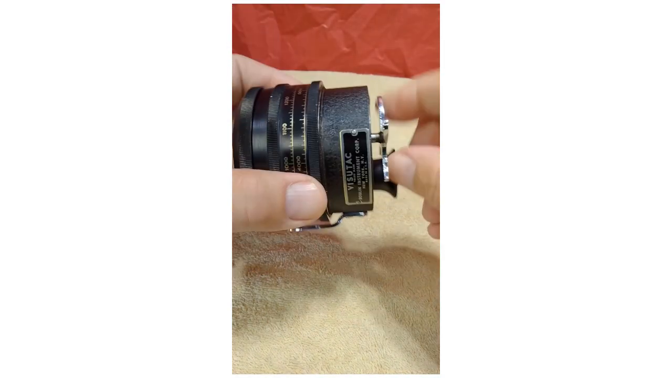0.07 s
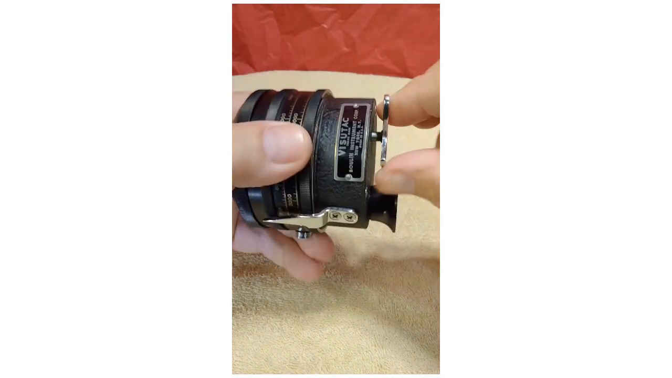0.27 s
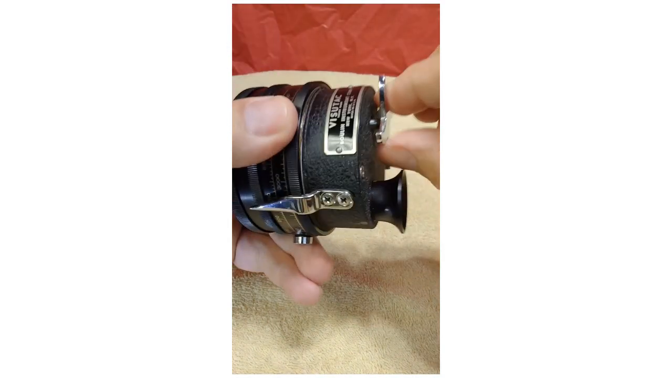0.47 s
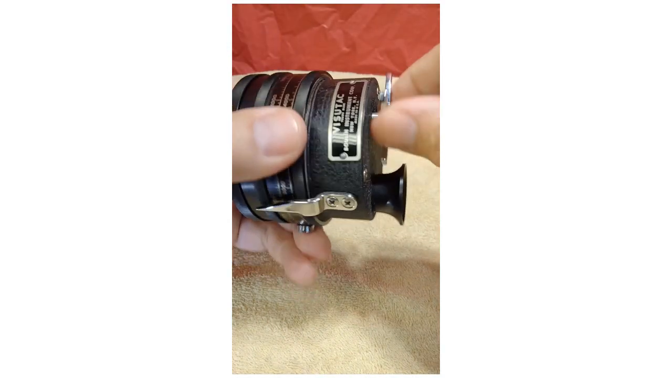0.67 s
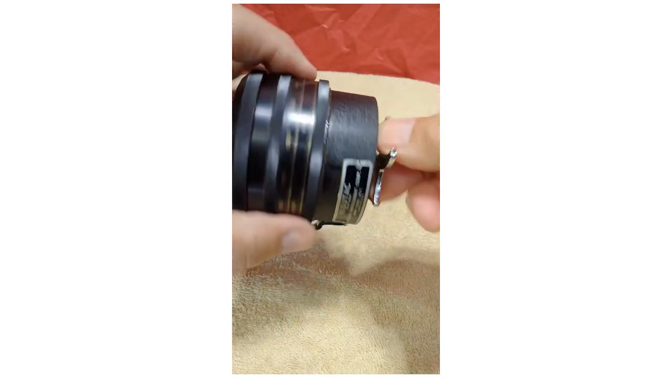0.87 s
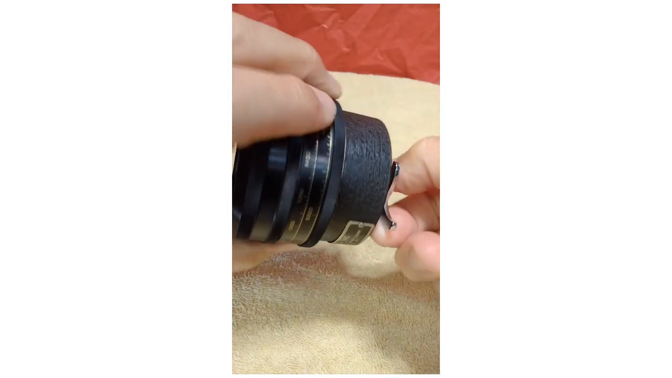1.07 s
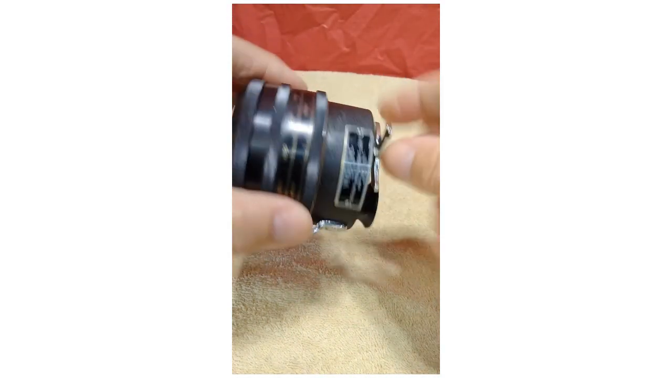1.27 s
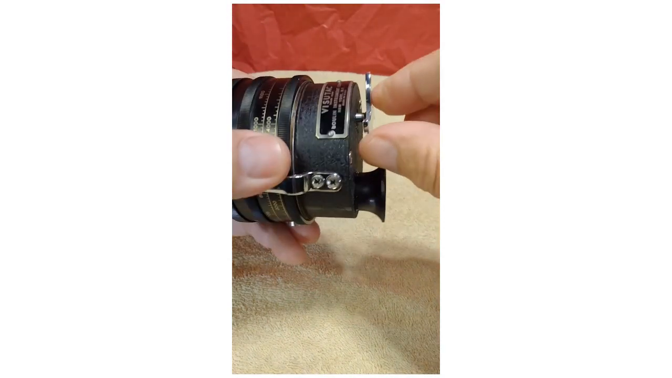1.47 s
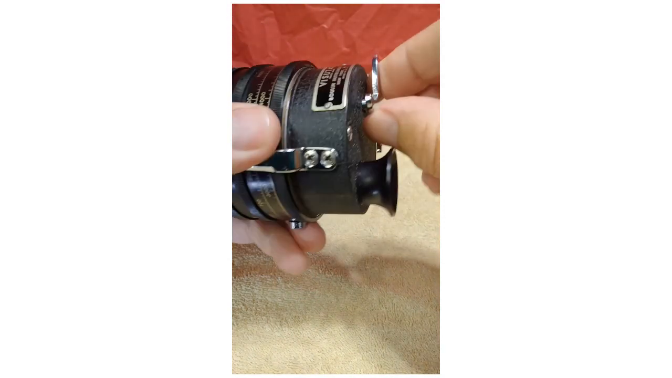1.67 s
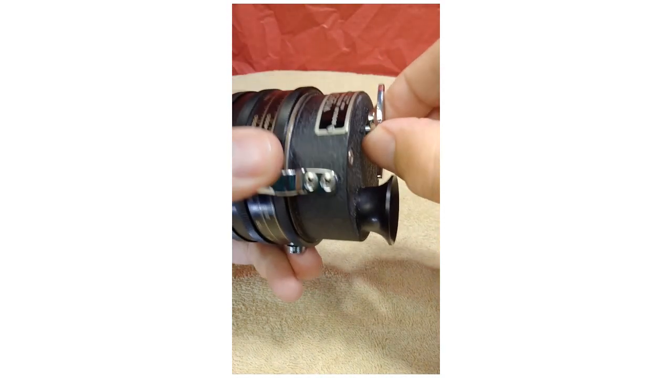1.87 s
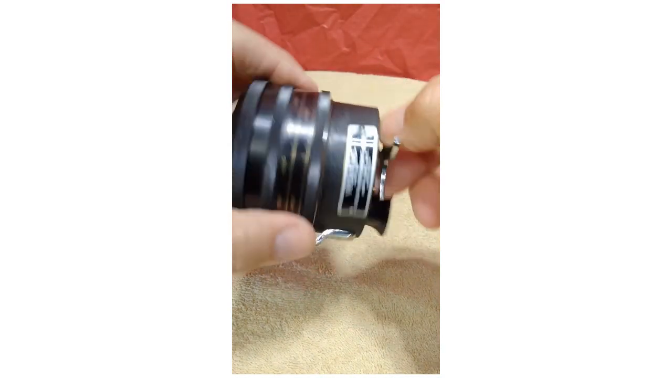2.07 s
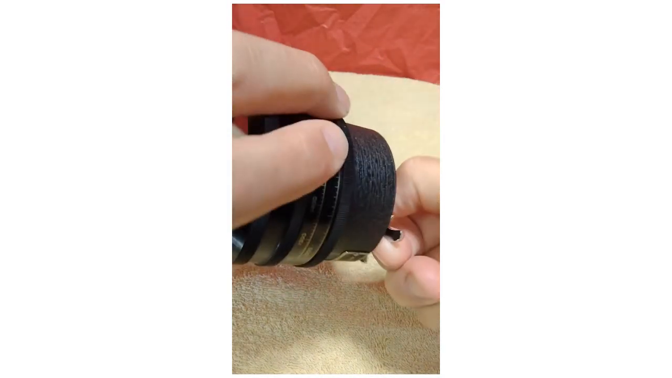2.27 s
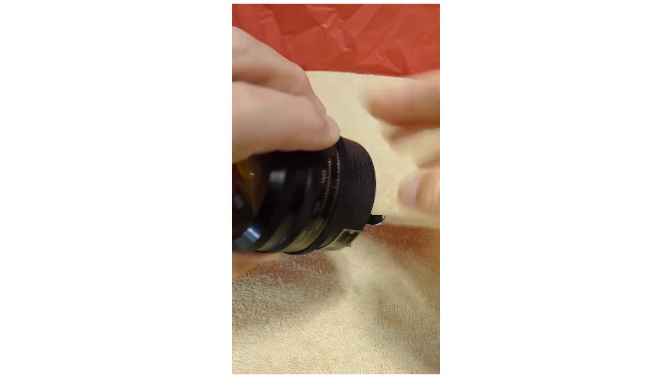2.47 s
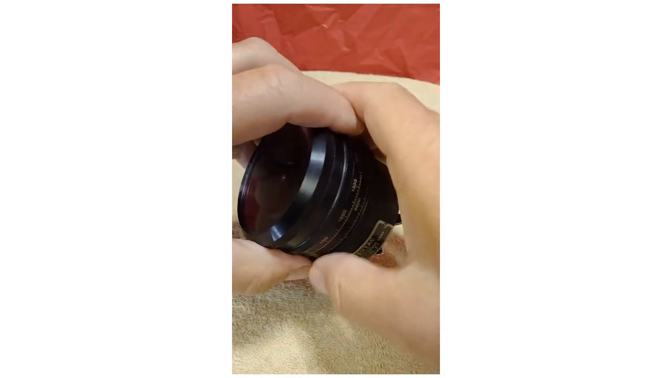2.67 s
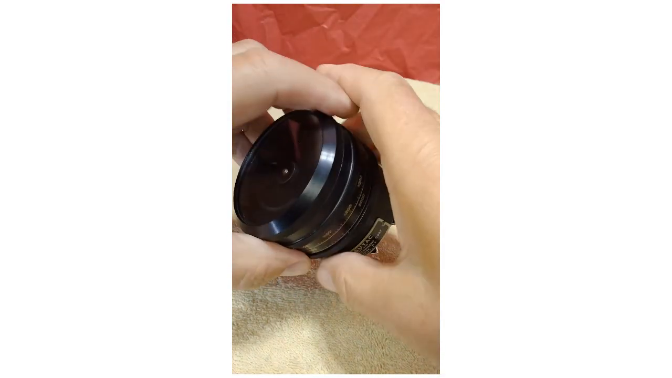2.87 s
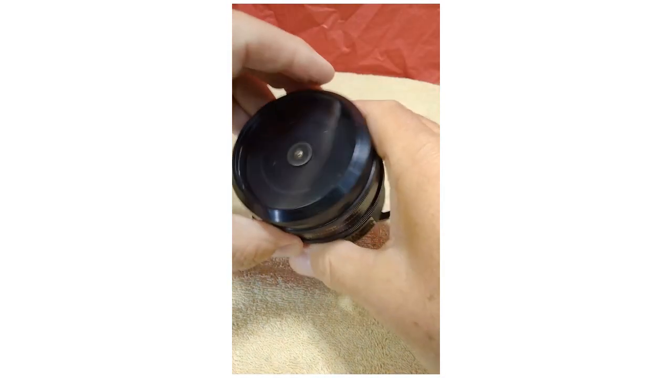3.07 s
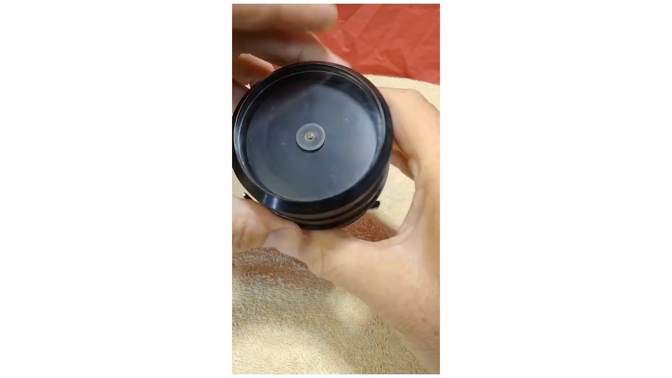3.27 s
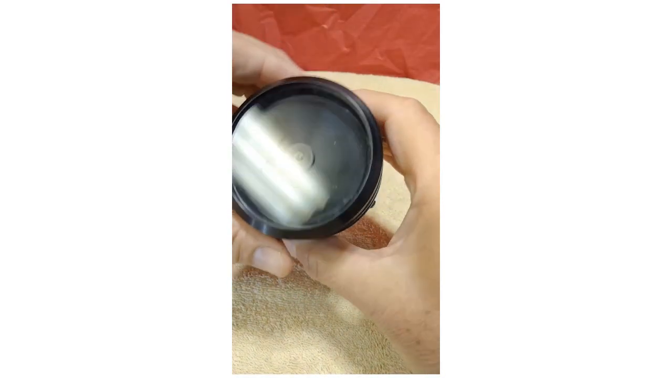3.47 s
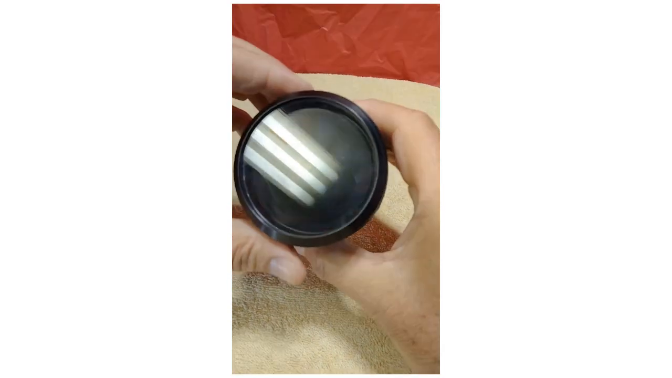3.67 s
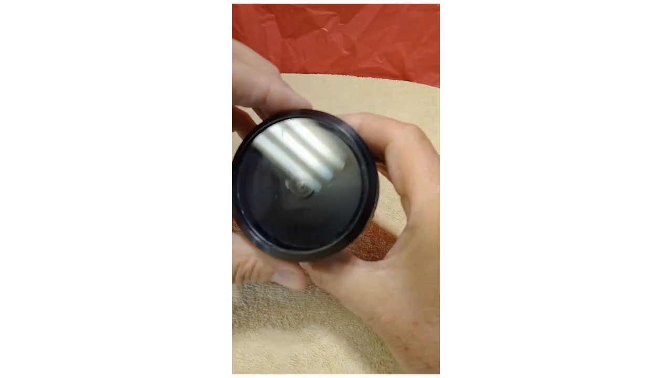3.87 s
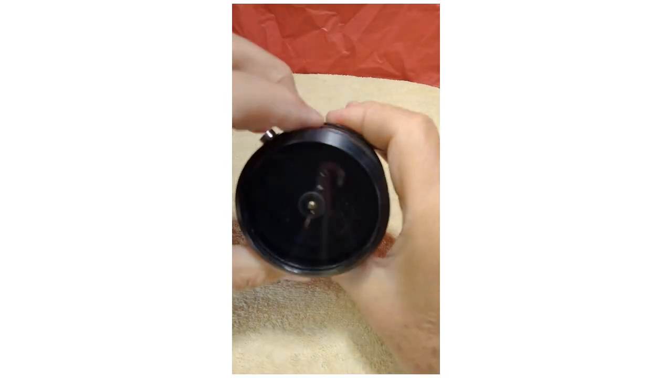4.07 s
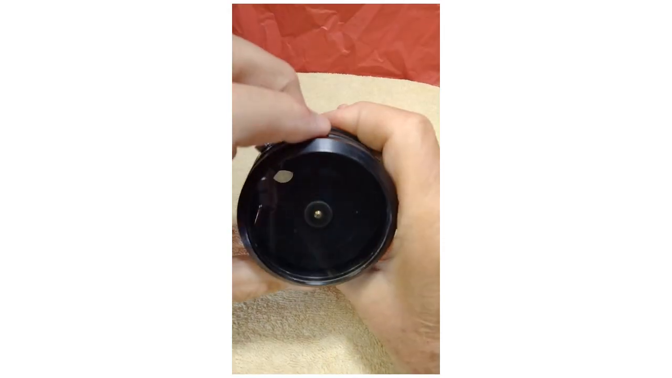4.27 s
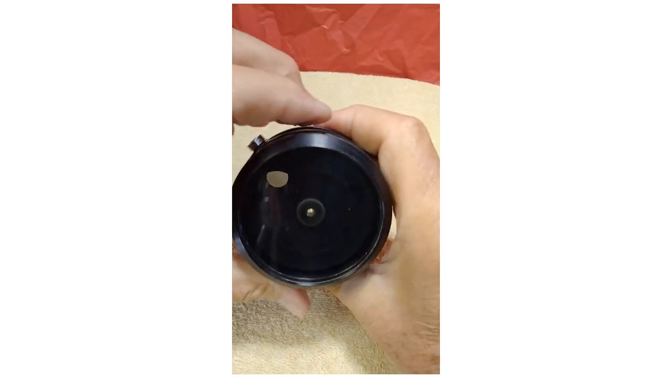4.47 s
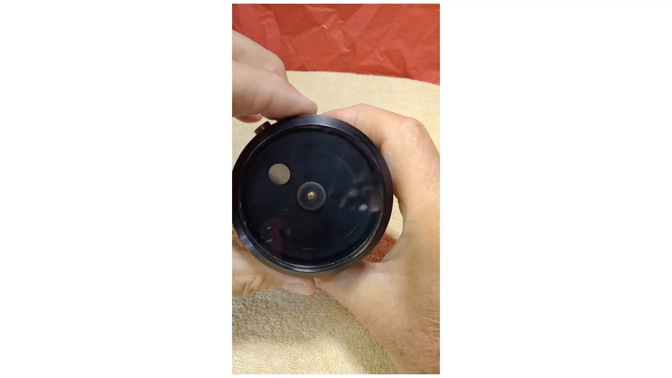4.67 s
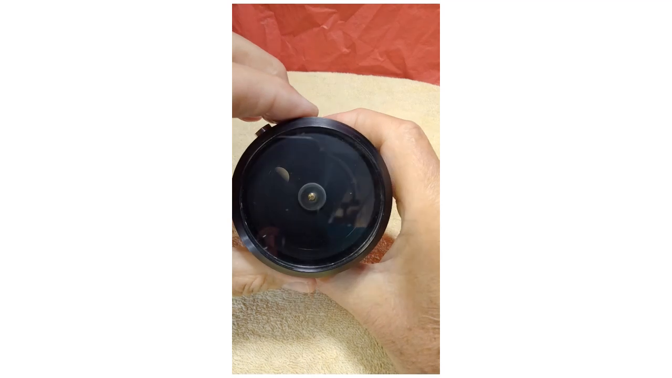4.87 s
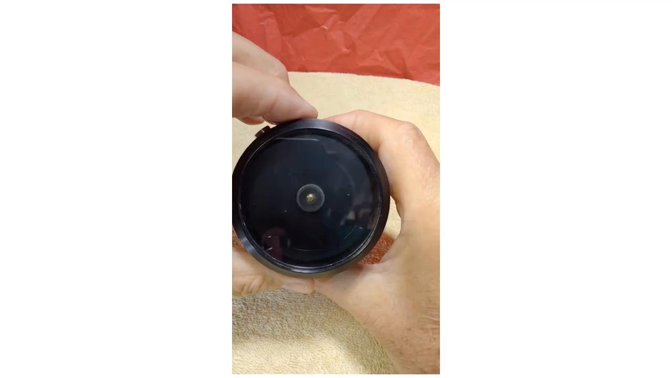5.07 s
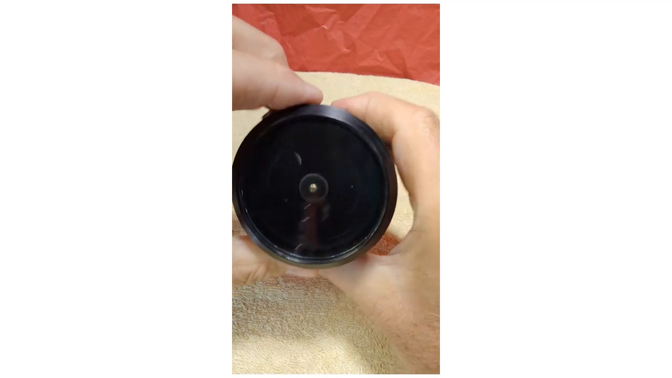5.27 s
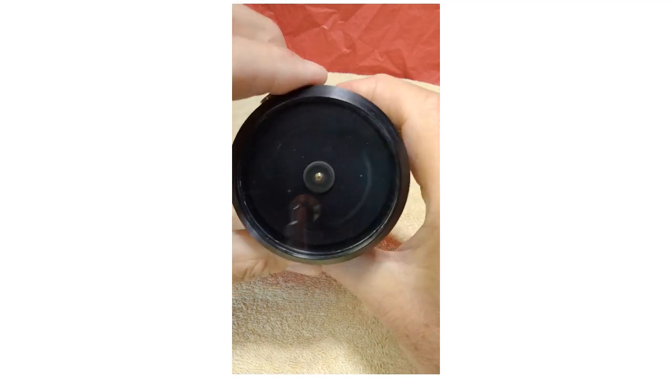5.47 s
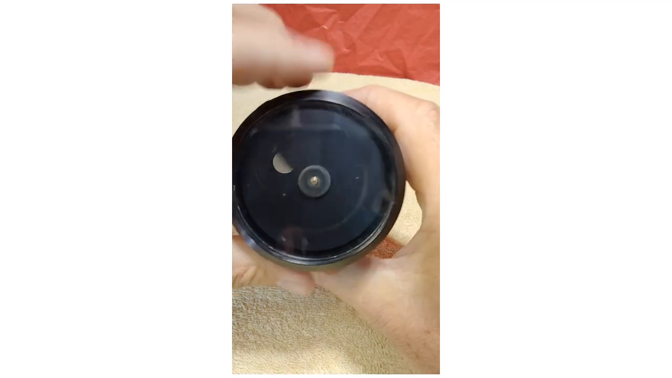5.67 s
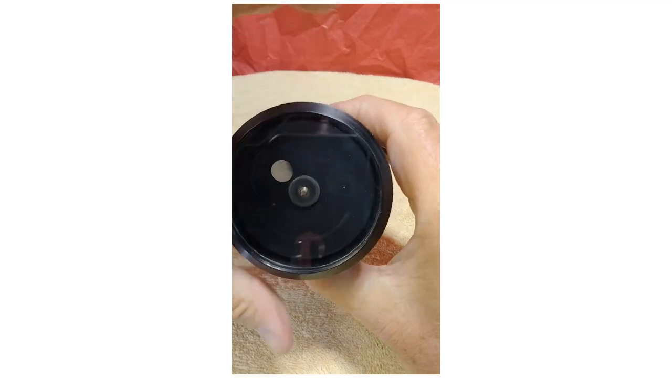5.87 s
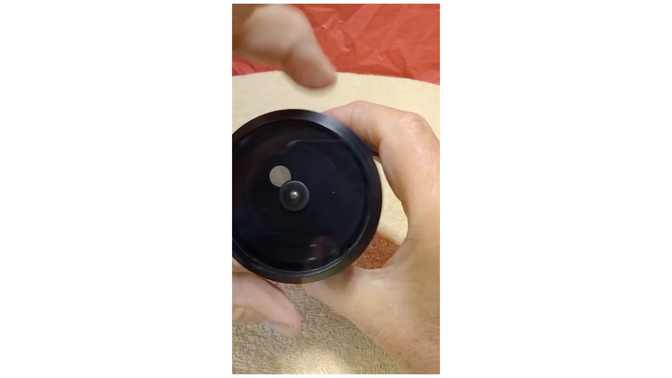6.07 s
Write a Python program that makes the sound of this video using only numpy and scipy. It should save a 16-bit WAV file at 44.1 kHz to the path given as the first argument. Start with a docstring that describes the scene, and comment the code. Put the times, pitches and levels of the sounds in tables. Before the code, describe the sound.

A small metal clockwork mechanism whirs with very fast, thin ticking, close up in a quiet small room. Fingers rub and thud dully on its case, then the key is wound in two short runs of bright, crisp ratchet clicks with faint scrapes between. The ticking grows stronger and quicker, then continues steadily, its metallic colour shifting as the object is turned, with several button clunks.

```python
"""Fast, metallic ticking is heard first, while fingers rub and thud on a hand-held clockwork tachometer.
Two turns of its key follow, as rows of bright pawl snaps with scrapes between; later a button clunks.
Each tick is a burst of noise that rings the metal case, whose colour changes as the dial turns to the front.
Thuds and clunks are decaying tones, and rubs are filtered noise, all close to a phone in a small room."""
import sys
import numpy as np
from scipy import signal
from scipy.fft import rfft, irfft, next_fast_len
from scipy.io import wavfile
from scipy.ndimage import uniform_filter1d, map_coordinates

SR = 44100
rng = np.random.default_rng(int(sys.argv[2]) if len(sys.argv) > 2 else 0)


def unload_wav(signal):
    """Save mono or channel-first audio to the path in sys.argv[1] as 16-bit WAV at rate SR, clipped to [-1, 1]."""
    wavfile.write(
        sys.argv[1],
        SR,
        np.round(np.clip(np.atleast_2d(signal).T, -1, 1) * 32767).astype(np.int16),
    )


N = 269451
TIME = np.arange(N) / SR  # seconds
FREQ = np.maximum(np.arange(2049) * SR / 4096, 1)  # Hz
TEETH = 8  # ticks in one turn of the wheel


def undb(db):
    """Turn decibels into gain."""
    return 10 ** (np.asarray(db) / 20)


def unit(x):
    """Scale a sound to an rms of 1."""
    return x / np.sqrt(np.mean(x ** 2))


def curves(table):
    """Draw straight lines between the rows of a time table, giving each column one value a sample."""
    s, *columns = np.transpose(table)
    return [np.interp(TIME, s, column) for column in columns]


def tone(points, peaks=()):
    """Make a dB response: a broad slope with resonances (Hz, width in Hz, dB) standing on it."""
    hz, db = np.transpose(points)
    slope = np.interp(np.log(FREQ), np.log(hz), db)
    bumps = sum(undb(d) ** 2 / (1 + (2 * (FREQ - f) / w) ** 2) for f, w, d in peaks)
    return slope + 10 * np.log10(1 + bumps)


def colour(x, db):
    """Filter a sound with a dB response, using a minimum-phase filter that never sounds early."""
    cepstrum = irfft(np.log(undb(db)))
    half = len(cepstrum) // 2
    # folding the cepstrum onto its first half keeps all of the response after the blow
    cepstrum[1:half] *= 2
    cepstrum[half + 1:] = 0
    response = irfft(np.exp(rfft(cepstrum)))[:half]
    return signal.oaconvolve(np.atleast_2d(x), response[None], axes=1)[:, :x.shape[-1]]


def ring(modes):
    """Add up decaying sines (Hz, t60 in s, dB) after a blow; neighbours swing in opposite directions."""
    t = TIME[:SR // 2]
    total = np.zeros(len(t))
    for k, (hz, t60, db) in enumerate(modes):
        decay = np.exp(-np.log(1000) * t / t60)
        total += (-1) ** k * undb(db) * np.sin(2 * np.pi * hz * t) * decay
    return total


def excite(x, modes):
    """Drive a set of ringing modes with a force."""
    return signal.oaconvolve(x, ring(modes)[None], axes=1)[:, :N]


def noise(likeness, size=N):
    """Make two channels of noise; likeness is their correlation, from -1 to 1."""
    mid, side = rng.standard_normal((2, size))
    c = np.clip(likeness, -1, 1)
    return np.sqrt((1 + c) / 2) * mid + np.sqrt((1 - c) / 2) * np.array([side, -side])


def burst(t, rise_s, decay_s):
    """Shape the loudness of a contact that rises quickly and dies away."""
    return (1 - np.exp(-(t / rise_s) ** 2)) * np.exp(-t / decay_s)


def add(out, s, sound):
    """Mix a sound in at time s."""
    start = max(int(s * SR), 0)
    piece = sound[..., :N - start]
    out[:, start:start + piece.shape[-1]] += piece


def walk(rate):
    """Drift at random around zero, heading for a given number of new values a second."""
    knots = rng.standard_normal(int(rate * N / SR) + 2)
    drift = np.interp(TIME * rate, np.arange(len(knots)), knots)
    return uniform_filter1d(drift, int(SR / rate / 2))


def high_pass(x, hz):
    """Remove the bass below hz."""
    return signal.sosfilt(signal.butter(5, hz, "high", fs=SR, output="sos"), x)


def band(x, edges):
    """Keep the part of a sound between two frequencies."""
    return signal.sosfiltfilt(signal.butter(4, edges, "band", fs=SR, output="sos"), x)


def swells(table):
    """Make one smooth hump for each row (middle s, half length s, dB), paired with its dB."""
    return [(np.exp(-((TIME - s) / half_s) ** 2), db) for s, half_s, db in table]


def detune(x, shift_hz):
    """Slide a ring up or down by a moving number of Hz."""
    turning = np.exp(2j * np.pi * np.cumsum(shift_hz) / SR)
    return np.real(signal.hilbert(x, next_fast_len(N))[:, :N] * turning)


def fingers(x, nearest_s, furthest_s, echo, drift, count):
    """Comb the sound with echoes off the moving hands, so bright bands wander through it."""
    out = x.copy()
    for channel, direct in zip(out, x):
        for lag_s in np.geomspace(nearest_s, furthest_s, count):
            place = (TIME - lag_s - drift * walk(3)) * SR
            channel += rng.choice([-1, 1]) * echo * map_coordinates(direct, [place], order=3)
    return out / np.sqrt(1 + count * echo ** 2)


def clockwork(facing):
    """Each tooth strikes the pallet and chatters, ringing the case, its parts and the wheel's plate."""
    # The escapement gathers speed as the spring tightens and sags under the key.
    # Each row: time in seconds, ticks per second.
    speed = [(0, 87.33), (.15, 82.67), (.3, 95.14), (.5, 94.47), (.74, 104.87), (1.02, 106.85),
             (1.4, 129.17), (2.03, 123.01), (2.23, 107.6), (2.7, 125.08), (3.11, 120.17), (3.56, 122.41),
             (5.43, 121.09), (6.11, 122.57)]
    # The ticks get louder as the spring is wound, softer once the hand wraps the case.
    # Each row: time in seconds, tick level in dB before a small trim.
    whir = [(0, -49.5), (.7, -46), (1.05, -45.5), (1.3, -45.5), (1.85, -40.5), (2.6, -43.5), (3.05, -39),
            (3.3, -46.5), (3.85, -47), (4.45, -44.5), (5.3, -45), (6.11, -49)]
    # Loose rattle between the ticks. Each row: time in seconds, level in dB against the ticks' chatter.
    rattle = [(0, -20), (.7, -22), (1.4, -21), (1.9, -11), (2.5, -12), (3.2, -16), (4, -10), (6.1, -5)]
    # Case resonances. Each row: pitch in Hz, width in Hz, level in dB from the side, in dB from the dial.
    case_peaks = [(2640, 180, -2.5, 6.5), (5400, 67, -8, 8), (6500, 200, 7, 2.5), (7580, 68, -6, 0.5),
                  (9700, 90, -2, 15), (11300, 300, -20, 18), (13100, 280, -10, 0)]
    # Broad colour of a tick heard from the side. Each row: frequency in Hz, level in dB.
    side_tone = [(300, -8), (700, -34), (1300, -54), (1700, -4), (2400, 11.5), (4000, 11), (7000, 7),
                 (9300, 13.5), (11000, 13), (13000, 7.5), (15700, 2.5)]
    # The same heard from the dial. Each row: frequency in Hz, level in dB.
    dial_tone = [(300, -5), (750, -51), (1100, 8.5), (1700, -4.5), (2400, 0.5), (4000, 10.5), (9000, 8),
                 (11000, -8.5), (13000, -3.5), (14500, -1.5), (15700, 3)]

    rate, = curves(speed)
    tick_db, = curves(whir)
    # phase counts teeth: its whole part numbers the tooth, its fraction is the way to the next
    phase = np.cumsum(rate) / SR - .35 + TEETH
    tooth = phase.astype(int)
    # three random numbers for each tooth: lateness, force, and how hard it rings the parts
    lateness, luck, part_luck = rng.standard_normal((tooth.max() + 1, 3))[tooth].T
    late_s = 0.00021 * np.abs(lateness) + 1 / SR
    age = np.maximum((phase % 1) / rate - late_s, 0)  # seconds since the tooth struck
    uneven = undb(.8 * luck + .8 * walk(9))
    # the wheel runs slightly off centre, so the blows swell and fade with each turn
    turn = 2 * np.pi * phase / TEETH
    force = uneven * undb(1.3 * np.cos(turn + .3) + 1.3 * np.cos(2 * turn + 1.1))
    chatter = unit(force * burst(age, rise_s=.0004, decay_s=.0028))
    drive = chatter + undb(curves(rattle)[0])
    steady = np.sqrt(uniform_filter1d(drive ** 2, SR // 2))  # half-second average, to even the level
    # the first blow of each tooth is one click, at the moment its age starts to grow
    blows = force * (np.diff((age > 0) * 1., prepend=1) > 0)
    t = TIME[:SR // 40]

    def ticking(likeness):
        """First blows ring the metal alike every time; the chatter after them never repeats."""
        metal = noise(likeness, size=len(t)) * burst(t, rise_s=.0004, decay_s=.0025)
        struck = unit(signal.oaconvolve(blows[None], metal, axes=1)[:, :N])
        return (drive * noise(likeness) + undb(-8) * struck) / steady

    case = np.array(case_peaks)
    side_peaks, dial_peaks = case[:, :3], np.delete(case, 2, axis=1)
    side = unit(colour(ticking(0.035), tone(side_tone, side_peaks)))
    dial = unit(colour(ticking(-0.31), tone(dial_tone, dial_peaks)))
    blend = np.sqrt(1 - facing) * side + np.sqrt(facing) * dial
    out = blend * undb(tick_db - 0.18)
    out = fingers(out, nearest_s=.0003, furthest_s=.002, echo=.22, drift=.0001, count=4)
    blow = force * unit(burst(age, rise_s=.0002, decay_s=.0007)) + .4 * drive
    out += ringing_parts(blow / steady * undb(part_luck))
    return out + shaken_plate(drive / steady, phase, rate)


def ringing_parts(blow):
    """Every tooth strikes the parts afresh; the shifting grip damps and detunes their ringing."""
    # Ringing modes of each part. Each row: pitch in Hz, t60 in seconds, level in dB.
    shell = [(1715, .024, -8), (1860, .022, -2), (1960, .034, 0), (2070, .012, -11)]  # lowest modes of the shell
    cover = [(3374, 0.012, -4.5), (3780, 0.0021, -5.5)]  # back cover
    rim = [(4262, 0.022, 2.5), (4360, 0.011, -2)]
    barrel = [(4960, 0.01, 6.5), (4760, 0.0027, -8)]  # spring barrel
    bezel = [(9255, 0.013, -2), (9230, .007, -13)]
    glass = [(9980, 0.015, 0)]
    # The shell rings freely or is damped by the palm; a small drift is added to these levels and those below.
    # Each row: time in seconds, level in dB.
    shell_ring = [(0, -51), (.17, -57.5), (.3, -49.5), (.44, -70), (.72, -53.5), (.9, -57), (1.1, -47.5),
                  (1.36, -48), (1.48, -60.5), (1.6, -49), (1.9, -43.5), (2.4, -49), (2.52, -51),
                  (2.65, -41.5), (3.12, -43.5), (3.33, -54.5), (3.9, -56), (4.07, -45.5), (4.3, -56),
                  (4.7, -56.5), (4.8, -45), (4.949, -54.5), (5.8, -55), (6.05, -48)]
    # The fingers free and cover the back cover. Each row: time in seconds, level in dB.
    cover_ring = [(0, -85), (.33, -54), (.45, -72), (.75, -53), (1.3, -61.5), (1.55, -53), (1.85, -49.5),
                  (2.45, -51.5), (2.6, -62), (3.1, -54), (3.4, -67)]
    # The fingers free and cover the rim. Each row: time in seconds, level in dB.
    rim_ring = [(0, -65), (.6, -59), (1.25, -51.5), (1.45, -52), (1.6, -56), (2.3, -45), (2.7, -49.5),
                (3.25, -46.5), (3.55, -54.5), (4.0, -51), (4.45, -49.5), (4.8, -57.5), (5.15, -59),
                (5.5, -62)]
    # The fingers free and cover the barrel. Each row: time in seconds, level in dB.
    barrel_ring = [(0, -66), (1.1, -50.5), (1.42, -56.5), (1.65, -49.5), (2.3, -47.5), (3.05, -52),
                   (3.4, -56), (3.9, -56), (4.08, -50), (4.25, -52), (5.2, -53), (6.1, -55)]
    # The bezel's ring swells and slides as the glass swings past the listener; a drift is added to the slide.
    # Each row: time in seconds, level in dB, shift in Hz.
    bezel_ring = [(0, -54.5, 0), (.6, -55, 151), (1.45, -52.5, 79.5), (2, -48, -0.5), (2.6, -48, 0.5),
                  (2.75, -53, 49.5), (3, -56, 61), (3.25, -60, 248.5), (3.429, -48.5, 401),
                  (3.6, -44, 159.5), (3.849, -52.5, 50), (4.05, -50.5, 230.5), (4.3, -58.5, -58.5),
                  (4.58, -47.5, -62), (4.801, -64, 0.5), (5.799, -56, -1), (6.05, -47.5, 0.5)]
    # The glass rings just above the bezel. Each row: time in seconds, level in dB, shift in Hz.
    glass_ring = [(0, -56, -50.5), (1.3, -60.5, 49.5), (2.85, -51, 200), (3.3, -58, 100),
                  (3.62, -49.5, 479), (4.05, -56, 448.5), (4.65, -58, 154), (5.199, -60, 521),
                  (5.75, -61, 518.5)]

    def rung(modes, db, slide_hz=0):
        """One part, driven by the blows and then detuned and set to its moving level."""
        struck = excite(blow * noise(0.013), modes)
        slid = unit(detune(struck, slide_hz + 38 * walk(6)))
        return slid * undb(db + 1.8 * walk(11))

    parts = [(shell, shell_ring), (cover, cover_ring), (rim, rim_ring),
             (barrel, barrel_ring), (bezel, bezel_ring), (glass, glass_ring)]
    return sum(rung(modes, *curves(table)) for modes, table in parts)


def shaken_plate(drive, phase, rate):
    """Once a turn the wheel shakes its plate, which rings as a clack."""
    # Modes of the plate. Each row: pitch in Hz, t60 in seconds, level in dB.
    plate_modes = [(1130, .026, -1), (1260, .018, -6), (1395, .028, 0), (1945, .03, -2), (4380, .012, 7),
                   (4950, .012, 4)]
    # The once-a-turn clack. Each row: time in seconds, level in dB.
    clack = [(0, -58), (1.5, -97), (2.1, -54), (2.6, -54), (3.3, -52), (4.4, -51), (6.1, -48)]
    lead_teeth = 2.4  # the shake comes this far ahead of the end of each turn
    turn_age = ((phase + lead_teeth) % TEETH) / rate
    knock = drive * (burst(turn_age, rise_s=.005, decay_s=.012) + .025)
    plate = high_pass(excite(knock * noise(-.75), plate_modes), hz=1000)
    # averaging over two turns: every turn shakes the plate about equally hard
    two_turns = int(2 * TEETH * SR / rate[-1])
    plate /= np.sqrt(uniform_filter1d(np.mean(plate ** 2, axis=0), two_turns))
    return plate * undb(curves(clack)[0])


def skin_rub():
    """Skin slides on the case: soft filtered noise that swells whenever the fingers take a new hold."""
    # Colour of skin on the case. Each row: frequency in Hz, level in dB.
    rub_tone = [(80, -33), (180, -3), (280, 1.5), (420, -4.5), (650, -21.5), (1200, -14)]
    # Fingers slide to a new hold. Each row: middle in seconds, half length in seconds, level in dB.
    rubs = [(.12, 0.28, -55.5), (.6, 0.22, -56), (2.76, 0.29, -49.5), (3.22, 0.15, -50), (3.49, 0.1, -52),
            (3.57, 0.28, -50), (3.9, 0.23, -54.5), (4.42, 0.093, -52), (4.6, 0.25, -52.5), (5.6, 0.25, -53),
            (6.09, 0.23, -49.5)]
    rest_db = -69  # rub of the resting hands
    rub = colour(noise(0.97), tone(rub_tone))
    power = undb(rest_db) ** 2 + sum((hump * undb(db)) ** 2 for hump, db in swells(rubs))
    return unit(rub) * np.sqrt(power) * undb(2.2 * walk(60))


def thuds():
    """Key and fingers thud dully on the hand-damped body: short low modes plus a noisy contact."""
    # Each row: start in seconds, level in dB, hard contact in dB relative to the thud.
    thud_times = [(0.316, -25.5, -5), (0.388, -43.5, -24), (0.497, -26, 3), (0.629, -28.5, -8),
                  (1.292, -30.5, -21), (2.526, -47.5, 18), (2.549, -22.5, -9.5)]
    # Modes of the body. Each row: pitch in Hz, t60 in seconds, level in dB.
    thud_modes = [(200.6, 0.065, 0), (311, 0.023, 0), (454, 0.017, -13.5)]
    # Colour of the hard contact. Each row: frequency in Hz, level in dB.
    contact_tone = [(150, 15), (400, 14.5), (900, 12.5), (1400, 11), (2000, 23), (2500, -4.5), (5000, -45)]
    out, t = np.zeros((2, N)), TIME[:SR // 10]
    for s, db, hard_db in thud_times:
        contact = burst(t, rise_s=0.0018, decay_s=0.0024) + 0.16 * burst(t, rise_s=0.0015, decay_s=0.013)
        crack = colour(contact * noise(0.066, size=len(t)), tone(contact_tone))
        add(out, s, undb(db) * ring(thud_modes))
        add(out, s, undb(db + hard_db) * crack)
    # so small a body radiates little bass
    return high_pass(out, hz=140)


def ratchet():
    """The pawl drops off each tooth with a short, bright snap, then scrapes up the back of the next."""
    # Pawl snaps. Each row: time in seconds before the delay below, level in dB in each of the four bands
    # below, left minus right in dB.
    pawl = [(0.7902, -39.5, -35, -32, -26, 2), (0.8308, -45, -40.5, -30, -27.0, -4.5),
            (0.8747, -44, -33, -29, -27, 1), (0.9044, -43, -41, -34.0, -30, 2),
            (0.9318, -51, -38, -33.5, -32, 4), (0.9582, -47, -36, -28.5, -27, 3.5),
            (0.9879, -41, -41, -34, -26, -6), (1.022, -36, -36.5, -26.5, -24, 0),
            (1.055, -47, -37, -35, -31, -2), (1.0901, -42, -36, -32, -29, -2.5),
            (1.1207, -45, -36.5, -31.5, -32, -8), (1.1262, -39, -42, -42, -41, -0.5),
            (1.1802, -37, -32.5, -32.5, -27.5, -4), (2.0831, -41, -32.5, -30, -27, 0),
            (2.1325, -41.5, -34, -32, -29, -5.5), (2.16, -33.5, -35.5, -28, -27, -3.5),
            (2.188, -37, -38.5, -33, -31, -1), (2.214, -40.5, -38, -31.5, -32, 1),
            (2.242, -35.5, -30, -28.5, -27.5, 2.5), (2.2702, -37.5, -32.5, -30.5, -32, 3.5),
            (2.3014, -36.5, -32, -26, -25.5, -3.5), (2.3346, -43, -40, -33.5, -27, -3),
            (2.3671, -32.5, -33.5, -33.5, -31, 1.5), (2.397, -37, -38, -31.5, -32, -2),
            (2.4229, -32, -37, -31, -32, 3), (2.452, -40.5, -35, -35, -29, -3),
            (2.4903, -63, -38, -37.5, -45, -3)]
    # The four bands of a snap. Each row: lower edge in Hz, upper edge in Hz.
    snap_bands = [(500, 2500), (2500, 6000), (6000, 11800), (11800, 16000)]
    # Broad colour of a snap. Each row: frequency in Hz, level in dB.
    pawl_tone = [(300, -25), (550, -1.5), (800, 9), (1300, -2.5), (1800, 16), (2500, 0), (5000, 3.5),
                 (7000, -4), (11000, 0), (13000, 6), (15500, 4.5), (16500, -31.5)]
    # Resonances of snap and scrape. Each row: pitch in Hz, width in Hz, level in dB (it varies in a snap).
    pawl_peaks = [(1984, 76, 11.6), (3290, 210, 7.9), (8000, 290, 9), (9800, 600, 4), (13500, 800, 1.5),
                  (14370, 600, 5.2)]
    # A snap favours one of these resonances. Each row: pitch in Hz, width in Hz, level in dB.
    snap_rings = [(3350, 300, 10), (5800, 400, 9), (7850, 450, 12), (9400, 500, 11)]
    # Colour of the pawl scraping on a tooth. Each row: frequency in Hz, level in dB.
    scrape_tone = [(500, -19), (2000, -5), (6000, -12.5), (11000, -7.5), (13500, -3.5), (15800, -11)]
    delay_s = .0007  # delay added to every snap time in the pawl table
    snap_s = .006  # length of a snap, over which its level counts
    out, t = np.zeros((2, N)), TIME[:SR // 16]
    shape = burst(t, rise_s=.0003, decay_s=.0018) + .04 * burst(t, rise_s=.002, decay_s=.008)
    gaps = np.diff([row[0] for row in pawl], append=np.inf)
    for (s, *bands_db, pan_db), gap_s in zip(pawl, gaps):
        # every snap rings the metal a little differently
        peaks = np.array(pawl_peaks, float)
        peaks[:, 2] += 2.5 * rng.standard_normal(len(peaks))
        peaks = [*peaks, snap_rings[rng.integers(len(snap_rings))]]
        snap = colour(shape * noise(0.0092, size=len(t)), tone(pawl_tone, peaks))
        snap = sum(unit(band(snap, edges)) * undb(db) for edges, db in zip(snap_bands, bands_db))
        pan = undb(np.array([[pan_db], [-pan_db]]) / 2)
        add(out, s + delay_s, snap * np.sqrt(snap_s / t[-1]) * pan)
        # the scrape sticks and slips, and lasts only while the key keeps turning
        if snap_s < gap_s < t[-1]:
            grit = undb(4.5 * walk(700)[:len(t)])
            slide = np.sin(np.pi * np.minimum(t / gap_s, 1)) * grit * noise(0, size=len(t))
            add(out, s, unit(colour(slide, tone(scrape_tone, pawl_peaks))) * undb(-47.5))
    return out


def bumps():
    """The hand bumps softly: a short 45 Hz sine that dies away."""
    # Each row: start in seconds, level in dB before the burst is doubled.
    bump_times = [(3.16, -59), (5.691, -50.5)]
    out, t = np.zeros((2, N)), TIME[:SR // 10]
    for s, db in bump_times:
        add(out, s, undb(db) * np.sin(2 * np.pi * 45 * t) * 2 * burst(t, rise_s=0.0023, decay_s=0.051))
    return out


def button_clunks():
    """The button pushes on the body, whose modes ring, and scuffs on in many small contacts."""
    # Each row: start in seconds, level in dB, contact time in seconds, scuffing in dB against the first blow.
    clunk_times = [(3.418, -20, 0.0028, -1), (3.432, -18.5, 0.0032, -30), (3.468, -30, 0.0044, -1),
                   (3.787, -23.5, 0.003, -10), (3.829, -39, 0.0037, -12), (4.354, -53.5, 0.00013, -3),
                   (5.531, -47.5, 0.00015, -10), (5.7514, -25.5, 0.0016, -13), (5.933, -35, 0.003, -1.5)]
    # Modes of the body. Each row: pitch in Hz, t60 in seconds, level in dB.
    clunk_modes = [(131, 0.052, -8), (260, 0.19, -15.5), (345.7, 0.15, -9.5), (430, 0.009, -9),
                   (500, 0.014, -3), (620, 0.065, 3), (692, 0.075, -1.5), (780, 0.027, 0),
                   (987, 0.037, 10.5), (1070, 0.027, 13.5), (1300, 0.042, 3), (1817, 0.02, 5.5),
                   (3024, 0.018, 7)]
    out, t = np.zeros((2, N)), TIME[:SR // 10]
    for s, db, contact_s, scuff_db in clunk_times:
        # a longer push leaves the higher modes still
        push = np.sin(np.pi * np.minimum(t / contact_s, 1)) ** 3
        scuff = noise(0.98, size=len(t)) * burst(t, rise_s=0.0038, decay_s=0.026)
        force = signal.unit_impulse(len(t)) + undb(scuff_db) * scuff / np.linalg.norm(scuff[0])
        body = signal.oaconvolve(ring(clunk_modes), push / push.sum())
        add(out, s, undb(db) * signal.oaconvolve(force, body[None], axes=1))
    return out


def handling():
    """Everything the hands do to the case, with the deep bass taken from thuds and clunks."""
    return skin_rub() + high_pass(thuds() + button_clunks(), hz=65) + bumps()


def ports(x, facing, depth):
    """Each microphone port hears its own colour, which depends on how the case is held."""
    # The two ports, before depth scales them. Each row: frequency in Hz, left minus right in dB from the
    # side, the same in dB from the dial.
    port_balance = [(205, 1.5, 0.5), (467, -5.5, -13), (1110, -1, 1.5), (1290, -0.5, 16.5), (1980, 8.5, 3),
                    (2900, 7, 6.5), (4080, 0.5, -1), (4740, 7.5, 1.5), (7340, 15.5, 7.5), (8100, -13, 5.5),
                    (9780, -5.5, -13.5), (12240, 0, 0), (15060, 30, 20), (14680, -25, -10)]
    hz, *views = np.array(port_balance).T

    def view(db):
        """Half of the difference goes to the left, the opposite half to the right."""
        tilt = depth * tone(np.c_[hz, db]) / 2
        return np.vstack([colour(x[0], tilt), colour(x[1], -tilt)])

    side, dial = [view(db) for db in views]
    return (1 - facing) * side + facing * dial


def room(x, t60_s, wet_db):
    """Add a faint, soft tail from the walls, made of dying noise."""
    t = TIME[:SR // 2]
    tail = noise(0.14, size=len(t)) * burst(t, rise_s=0.0014, decay_s=t60_s / np.log(1000))
    tail = colour(tail, tone([(100, -15.5), (600, -4), (3000, 6.5), (15000, -19.0)]))
    tail /= np.sqrt(np.sum(tail ** 2) / 2)
    return x + undb(wet_db) * signal.oaconvolve(x, tail, axes=1)[:, :N]


def quiet_room():
    """The quiet of the room: steady, mostly low noise."""
    # Each row: frequency in Hz, level in dB.
    room_tone = [(25, -7), (45, 2.5), (65, 8), (90, -2), (150, -3), (300, -16), (700, -21), (2000, -7),
                 (15000, -30.5)]
    return unit(colour(noise(0.15), tone(room_tone))) * undb(-57.5)


def scene():
    """Clockwork, hands and ratchet over the quiet of the room."""
    # The dial turns to the listener. Each row: time in seconds, share of the dial side in front (0 to 1).
    facing_share = [(0, 0), (2.4, 0.16), (3.0, 0.7), (3.4, 1), (4.2, 0.96), (6.1, 0.99)]
    facing = np.clip(curves(facing_share)[0], 0, 1)
    near = ports(clockwork(facing) + handling(), facing, depth=0.82)
    near += ports(ratchet(), facing, depth=0.44)
    return room(near, t60_s=.28, wet_db=-16) + quiet_room()


def record(dry):
    """A steep low-pass at 15950 Hz: nothing sounds above it."""
    return signal.sosfilt(signal.ellip(12, .2, 70, 15950, fs=SR, output="sos"), dry)


dry = scene()
out = record(dry)
unload_wav(out)
```